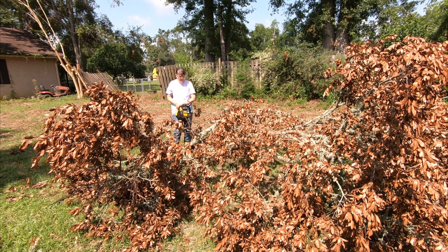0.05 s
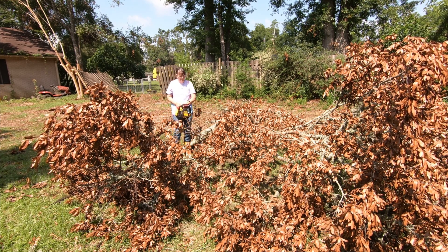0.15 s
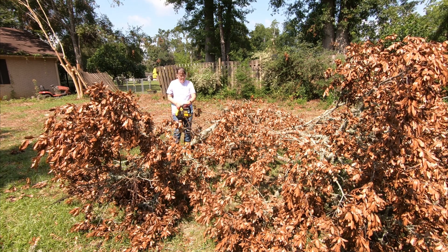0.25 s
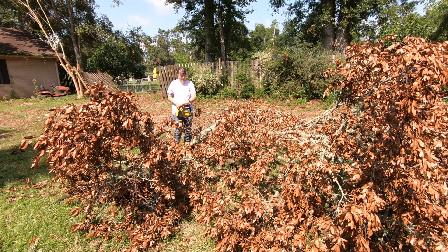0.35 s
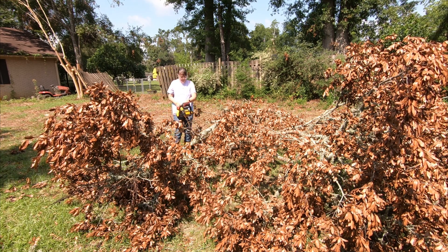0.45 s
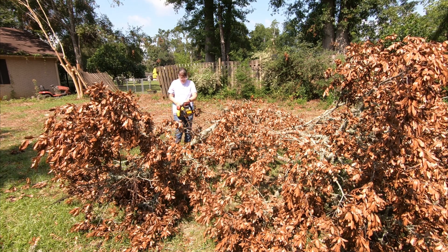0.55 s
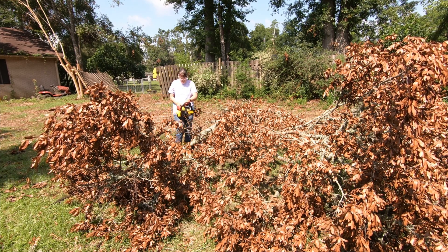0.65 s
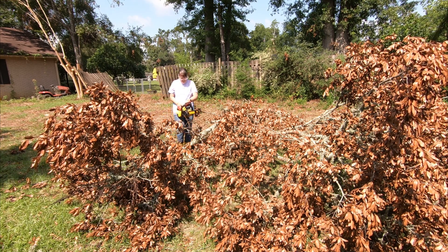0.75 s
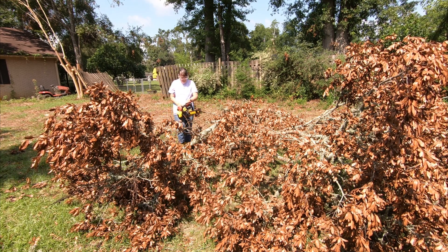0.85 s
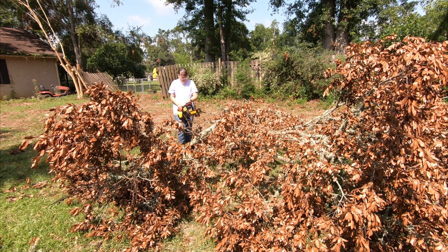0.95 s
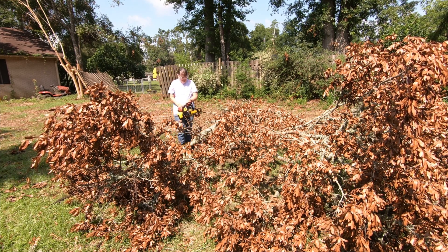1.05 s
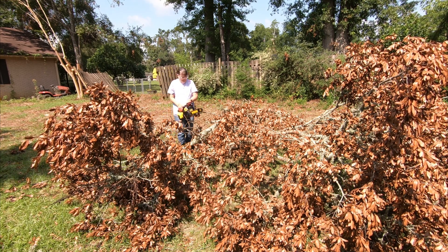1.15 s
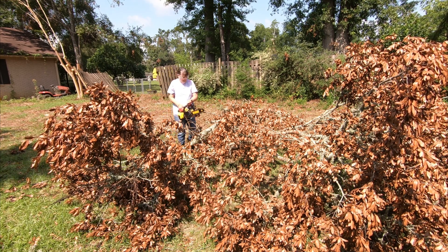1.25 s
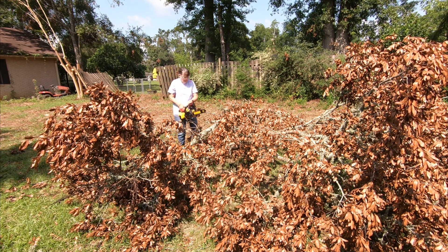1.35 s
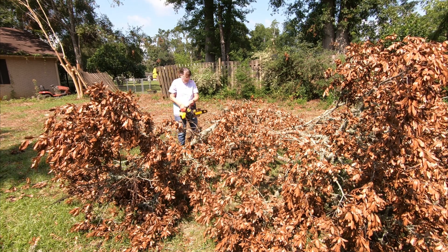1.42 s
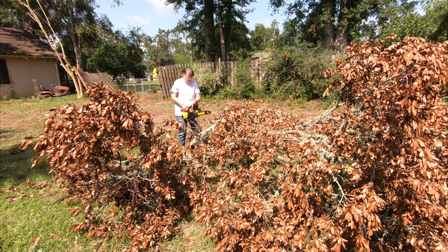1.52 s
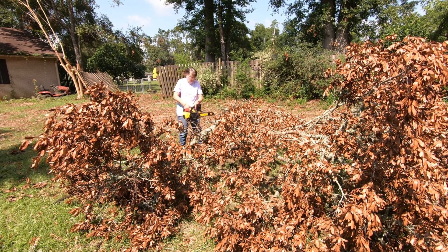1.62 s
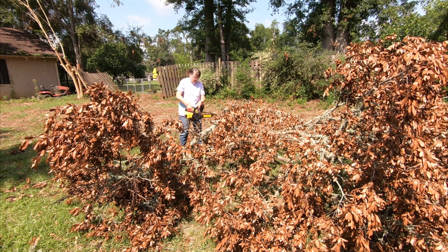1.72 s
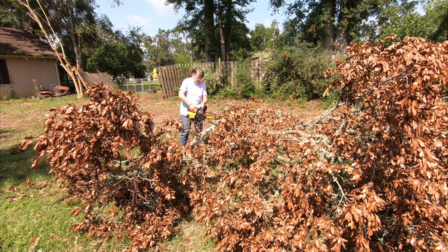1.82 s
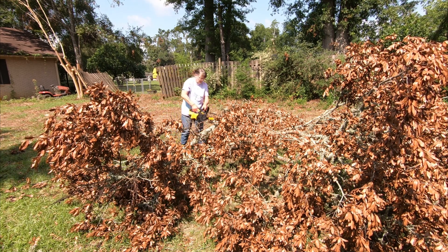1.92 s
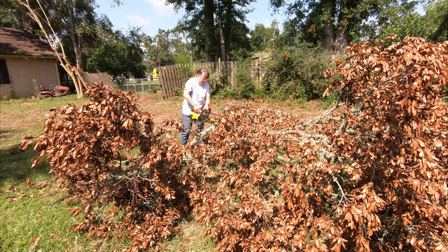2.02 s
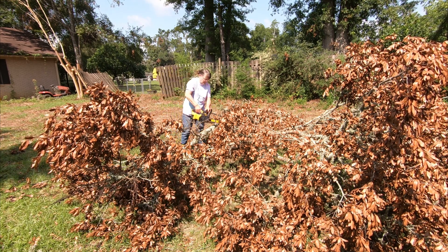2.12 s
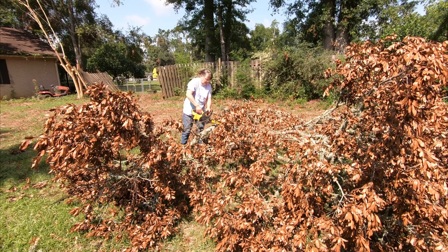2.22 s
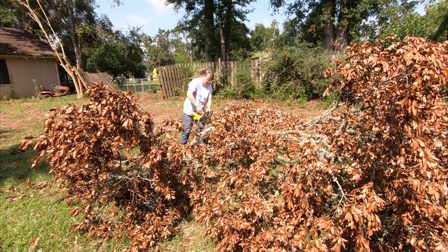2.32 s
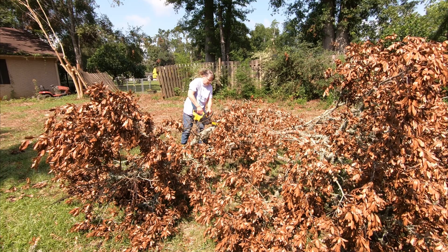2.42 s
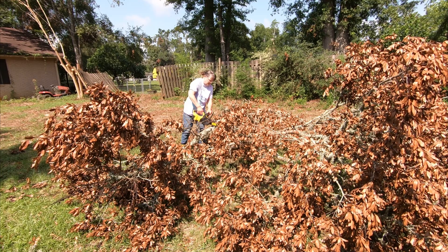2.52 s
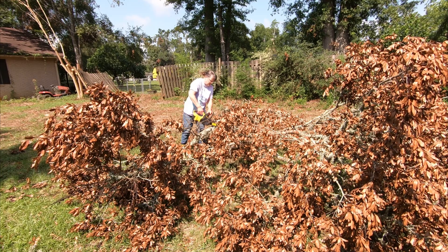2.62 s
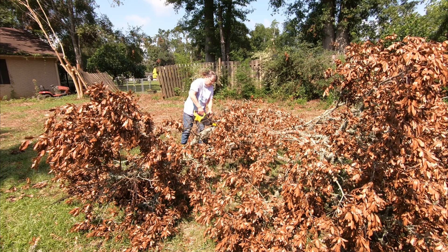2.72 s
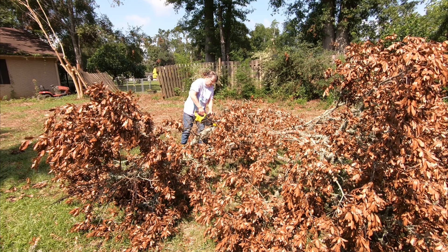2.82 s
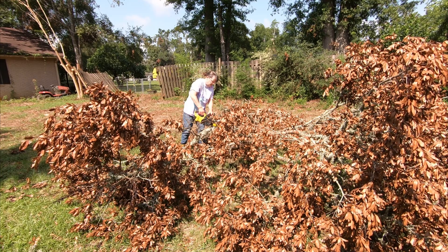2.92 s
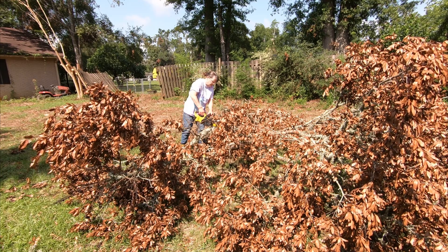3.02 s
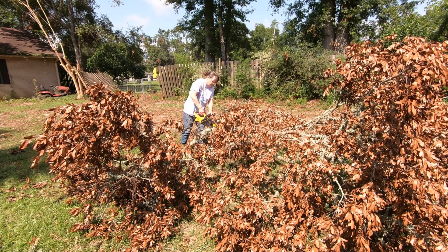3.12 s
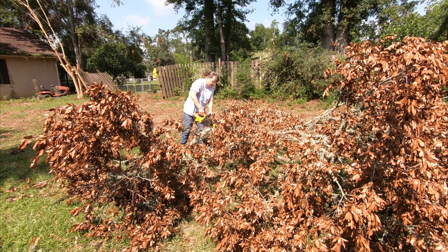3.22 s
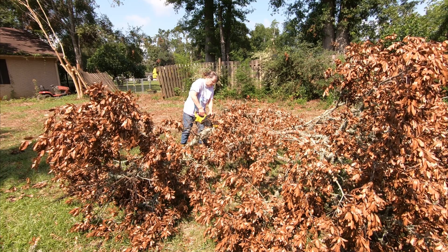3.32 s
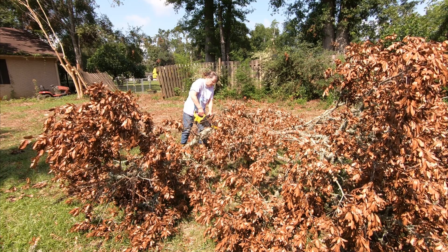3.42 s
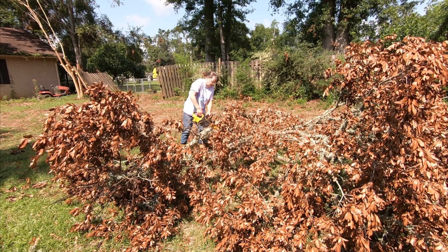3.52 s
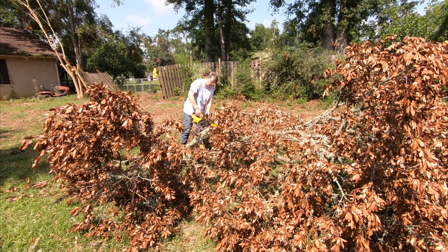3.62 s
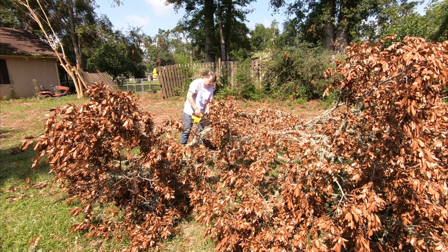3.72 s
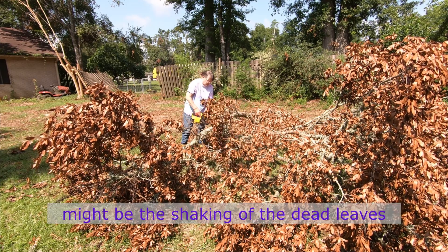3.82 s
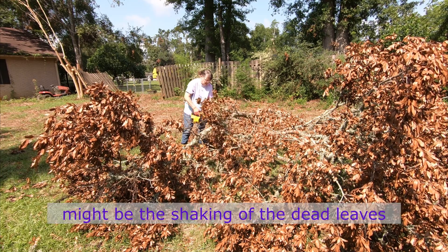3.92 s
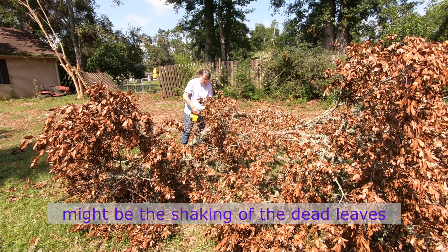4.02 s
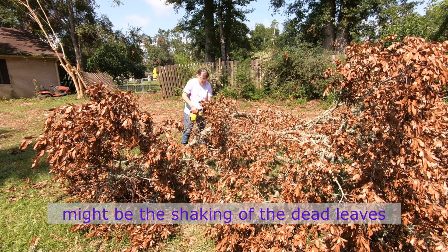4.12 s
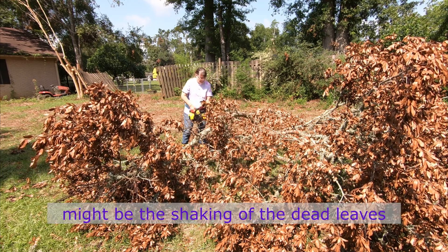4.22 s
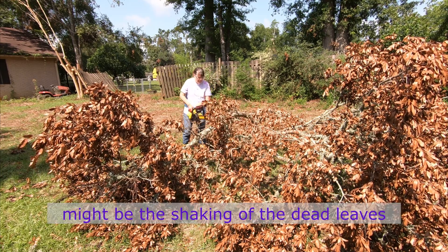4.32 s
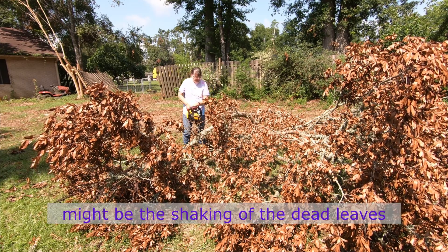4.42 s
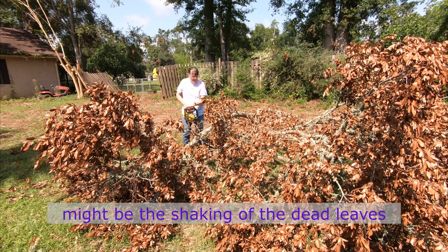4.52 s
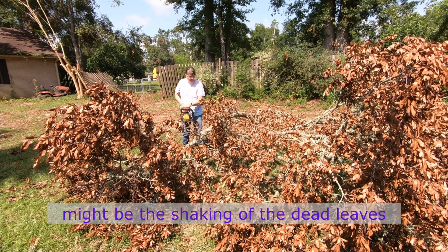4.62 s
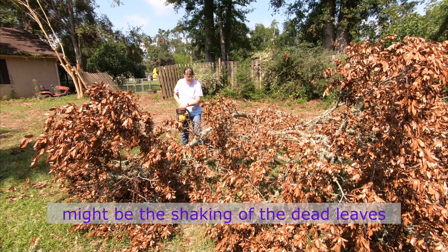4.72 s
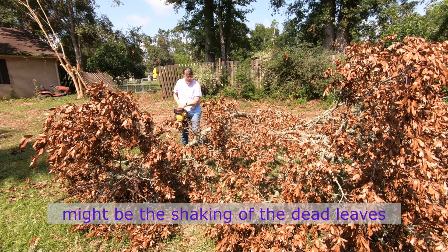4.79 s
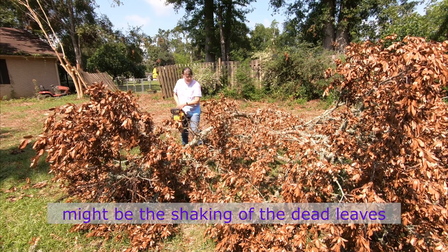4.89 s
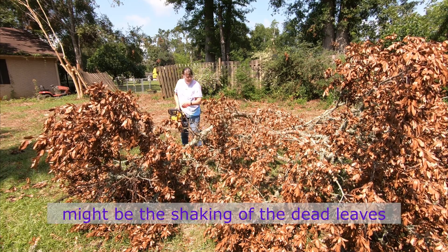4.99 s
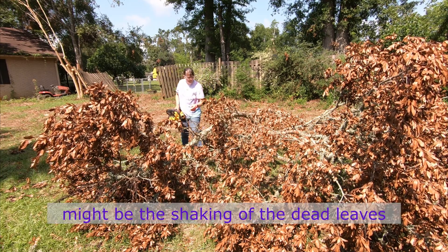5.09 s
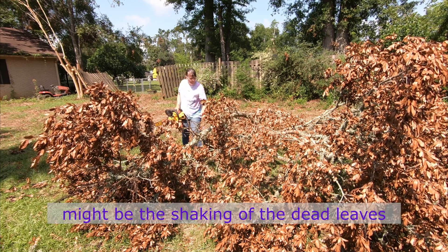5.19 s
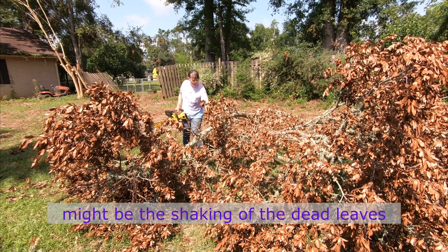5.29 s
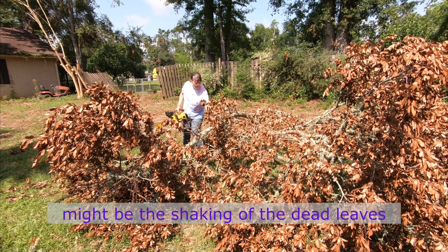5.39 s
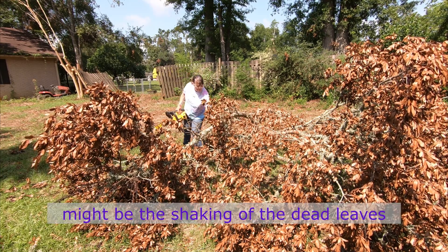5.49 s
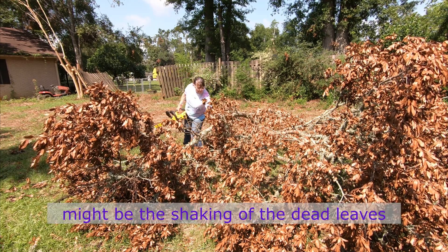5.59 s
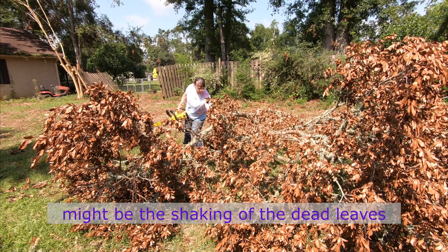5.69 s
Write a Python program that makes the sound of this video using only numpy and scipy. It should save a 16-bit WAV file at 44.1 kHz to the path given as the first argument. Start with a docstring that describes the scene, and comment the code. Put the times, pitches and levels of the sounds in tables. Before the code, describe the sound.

A small cordless chainsaw clicks on, whirs up to a rattling high whine, nips dry branches, then coasts down in a quiet garden as a bird calls.

```python
"""A katydid buzzes throughout as scraped resonances, over the coloured noise of a far road and low swells.
A cordless chainsaw, some metres off in a garden, clicks on, spins up, nips into dry branches and coasts to rest.
One chain speed drives its noisy rattle round the bar, the summed partials of its hum and the motor's whine.
As it stops a bird calls in gliding tones; then dry leaves crackle briefly while a far car passes.
A house wall and trees answer saw and bird with a smeared echo and a thin tail."""
import sys
import numpy as np
from scipy import signal
from scipy.fft import rfft, irfft, next_fast_len
from scipy.io import wavfile
from scipy.ndimage import uniform_filter1d, map_coordinates

SR = 44100
rng = np.random.default_rng(int(sys.argv[2]) if len(sys.argv) > 2 else 0)


def persist_wave(psi):
    """Save psi, clipped to +-1, as 16-bit WAV."""
    counts = np.round(np.clip(psi, -1, 1) * 32767).astype(np.int16)
    wavfile.write(sys.argv[1], SR, np.atleast_2d(counts).T)


N = 253575

# how alike left and right are in the open air: (frequency [Hz], correlation [-1 to 1])
AIR_ALIKE = [(150, .99), (900, 0.68), (2400, 0.8), (6000, 0.42)]
TOP_HZ = 15000  # upper limit of the whole sound
# the trigger is pulled and let go; the chain then takes this long to coast to rest
PULL_S, RELEASE_S, COAST_S = 1.449, 3.68, 0.42
FULL_HZ = 385.6  # cutters passing a second at full speed, free of drag


def amp(db):
    """Decibels to gain."""
    return 10 ** (np.asarray(db) / 20)


def unit(x):
    """Scaled to rms 1."""
    return x / np.sqrt(np.mean(x ** 2) + 1e-20)


def seconds():
    """The time of every sample."""
    return np.arange(N) / SR


def along(points, hz):
    """Reads (frequency [Hz], value) points on a log frequency axis."""
    f, v = np.transpose(points)
    return np.interp(np.log(hz + 1), np.log(f + 1), v)


def wobble(rate):
    """A smooth random curve, rate knots a second."""
    knots = rng.standard_normal(int(N * rate / SR) + 4)
    return map_coordinates(knots, [np.arange(N) * rate / SR])


def bumps(rows):
    """The sum of smooth bumps: (time [s], half length to 1/e [s], height)."""
    return sum(height * np.exp(-((seconds() - s) / length) ** 2) for s, length, height in rows)


def filtered(x, response):
    """Shapes x by a response of frequency, with room for the filter to ring."""
    m = next_fast_len(N + SR // 2)
    return irfft(rfft(x, m) * response(np.fft.rfftfreq(m, 1 / SR)), m)[..., :N]


def colour(spectrum):
    """The gain function of (frequency [Hz], level [dB]) points."""
    return lambda hz: amp(along(spectrum, hz))


def rush(gain, alike):
    """Stereo noise of rms 1, its colour and left-right likeness set by the mix of mid and side."""
    def mid_side(hz):
        turn = np.arccos(np.clip(along(alike, hz), -1, 1)) / 2
        return gain(hz) * [np.cos(turn), np.sin(turn)]

    mid, side = filtered(rng.standard_normal((2, N)), mid_side)
    return unit(np.array([mid + side, mid - side]))


def placed(x, balance):
    """Each frequency leans to its own side."""
    return filtered(x, lambda hz: amp(np.outer([.5, -.5], along(balance, hz))))


def add(track, start_s, sound):
    """Mixes a sound into a track at a time."""
    part = track[max(round(start_s * SR), 0):][:len(sound)]
    part += sound[:len(part)]


def ringing(modes, hz):
    """How strongly a set of resonant bands lifts a frequency: their powers add."""
    return np.sqrt(sum(amp(db) ** 2 / (1 + (2 * (hz - centre) / width) ** 2) ** 2
                       for centre, width, db in modes))


def katydid(sharp=0.72):
    """Each wing stroke scrapes a burst into a few narrow, very high resonances."""
    # bands of the buzz: (centre [Hz], width [Hz], level [dB])
    buzz_bands = [(10125, 680, -62), (9500, 1200, -68.5), (13900, 600, -79)]
    strokes = 68.7 * seconds() + .04 * wobble(5)  # about 69 a second, slightly uneven
    pulse = np.exp(-sharp * (strokes % 1))
    out = np.zeros((2, N))
    for centre, width, db in buzz_bands:
        scrape = pulse * rng.standard_normal((2, N))
        band = filtered(scrape, lambda hz: 1 / (1 + (2 * (hz - centre) / width) ** 2) ** 1.78)
        out += amp(db) * unit(band)
    return out


def traffic(rumble_db=-44, wash_db=-45):
    """Lumpy low rumble with swells, an even wash of tyres on a far road, and one car that comes and goes."""
    # colours of rumble, tyre wash and passing car: (frequency [Hz], relative level per Hz [dB])
    rumble_colour = [(20, -25), (35, -16), (50, -2.5), (66, 5), (90, 1), (182, -7.5), (260, -21.5),
                     (400, -32), (880, -86)]
    wash_colour = [(180, -4.5), (330, -14), (480, -11), (656, 0.5), (897, 2), (1730, -12.5), (2540, -17),
                   (3600, -21.5), (4740, -17), (6040, -28), (7700, -35), (9000, -28.5), (11700, -77)]
    car_colour = [(80, -9), (140, 4), (220, 1), (340, -17.5), (700, -7), (1100, -2.5), (1800, -18.5),
                  (4000, -59)]
    # low swells: a short thump of wind or handling, then slower rises of the road:
    # (time [s], half length to 1/e [s], rise [dB])
    low_swells = [(1.9, 0.16, 7), (2.7, 0.39, 3.8), (5.3, 0.96, 2)]
    # left over right: (frequency [Hz], balance [dB])
    air_side = [(180, 0.5), (550, 3.5), (1640, 5.5), (4950, -5), (10000, -4)]
    pass_s, pass_length_s, pass_db = 5.25, 0.78, -44.5  # the car's peak, half length to 1/e and peak level
    rumble_level = amp(rumble_db + bumps(low_swells) + 1.13 * wobble(24))
    rumble = rumble_level * rush(colour(rumble_colour), AIR_ALIKE)
    wash = amp(wash_db + .7 * wobble(6)) * rush(colour(wash_colour), AIR_ALIKE)
    passing = bumps([(pass_s, pass_length_s, 1)])
    car = amp(pass_db) * passing * rush(colour(car_colour), AIR_ALIKE)
    return placed(rumble + wash + car, air_side)


def clicks(t60=0.012, click_db=-8, dull_hz=8000):
    """Short dry snaps, each a crack and a narrow ring, dulled by distance."""
    # clicks of the trigger, chain and twigs: (time [s], relative level [dB], ring [Hz])
    snaps = [(1.407, -27.5, 3630), (1.446, -31, 3680), (2.907, -14, 3920), (3.309, -11, 3370),
             (3.364, -15, 3900), (3.373, -14, 4670), (3.593, -22, 4690), (4.081, -27.5, 2330)]
    out, t = np.zeros(N), np.arange(SR // 10) / SR
    for s, db, hz in snaps:
        noise = rng.standard_normal(len(t))
        ring = unit(signal.lfilter(*signal.iirpeak(hz, 6, SR), noise))
        crack = signal.lfilter(*signal.butter(2, min(2.5 * hz, TOP_HZ), fs=SR), noise)
        snap = ring * amp(-60 * t / t60) + 1.3 * crack * amp(-60 * t / 0.014)
        add(out, s, amp(db + click_db) * snap)
    return filtered(out, lambda hz: 1 / (1 + (hz / dull_hz) ** 4))


def drive(spin_up_s=0.893, rise_power=1.052, fall_power=1.175, crawl_hz=10):
    """Chain speed and bite: it spins up, sags at each nip while the governor catches up, then coasts."""
    # the chain nips a branch: (time [s], half length to 1/e [s], drag on the speed [Hz])
    nips = [(2.778, .061, 2.1), (2.909, .031, 12.6), (3.073, .064, 11.1), (3.167, .069, 10.9),
            (3.367, .079, 22), (3.609, .04, 8.8)]
    governor_gain, governor_lag_s = 1.44, 0.62  # speed given back per drag (ratio), after a lag
    deep_hz, shake_s = 6.4, 0.13  # drag of a deep bite, and how long the twigs shake
    t, drag = seconds(), bumps(nips)
    keep = np.exp(-1 / (governor_lag_s * SR))
    lagged_drag = signal.lfilter([1 - keep], [1, -keep], drag)
    governed = FULL_HZ - drag + governor_gain * lagged_drag
    rising = np.clip((t - PULL_S) / spin_up_s, 0, 1) ** rise_power
    falling = np.clip(1 - (t - RELEASE_S) / COAST_S, 0, 1) ** fall_power
    speed = np.maximum(governed * rising * falling, crawl_hz)
    bite = np.tanh(np.abs(uniform_filter1d(drag, int(shake_s * SR))) / deep_hz)
    return speed, bite


def loudness(law, speed, bite, slacken_s=0.24):
    """A layer's dB: it grows with speed and changes when the chain bites or the motor lets go."""
    full_db, power, bite_db, coast_db = law
    coasting = np.clip((seconds() - RELEASE_S) / slacken_s, 0, 1)
    return full_db + power * 20 * np.log10(speed / FULL_HZ) + bite_db * bite + coast_db * coasting


def bar(hz):
    """How strongly bar and housing ring at a frequency."""
    # resonances of bar and housing: (centre [Hz], width [Hz], level [dB])
    bar_modes = [(592, 223, 2), (1390, 110, 1.5), (1735, 260, 2), (2215, 530, -0.5), (3270, 570, -8.5),
                 (5090, 560, -10)]
    return ringing(bar_modes, hz)


def chain(cutters, speed, bite, chatter_db=1.7, clink_db=2.0):
    """Links clatter on the bar, in surges once a sprocket turn while the chain runs free."""
    # colours of the clatter and its treble: (frequency [Hz], relative level per Hz [dB])
    rattle_colour = [(120, -65), (200, -25.5), (330, -48), (430, -10.5), (560, -2), (720, -6), (860, -3.5),
                     (1010, -8.5), (1270, 0), (2070, -12), (2370, -5.5), (2820, -7.5), (4680, -8),
                     (5300, -9), (6500, -22.5), (9100, -51)]
    hiss_colour = [(3400, -38), (5800, -14), (6530, -5.5), (7250, -0.5), (7810, -3), (9760, 4),
                   (11000, -7.5), (14000, -16), (15000, -35)]
    # left-right likeness: (frequency [Hz], correlation [values over 1 count as 1])
    saw_alike = [(500, 1), (1600, 17.5), (4500, 1.35), (9000, 0.1), (14000, 2)]
    # (level at full speed [dB], power of speed, added by a deep bite [dB], added while coasting [dB])
    rattle_law = (-28, 0.91, -0.5, -2.8)
    hiss_law = (-39.5, 1.3, 1.5, -0.3)
    # the slack chain slaps the bar hardest at a middling speed, and falls off away from it
    slap_db, slap_hz, slap_fall_db = -33.5, 228, 8
    ring_db = slap_db - slap_fall_db * (speed / slap_hz - 1) ** 2
    surge = 1 + .24 * (1 - bite) * np.cos(2 * np.pi * cutters / 3)
    # a slow chain clinks unevenly, and twigs make a fast one chatter
    slow = 1 - speed / speed.max()
    jolt_db = (chatter_db * bite + clink_db * slow) * (wobble(330) + wobble(55)) / 2
    rattle = amp(loudness(rattle_law, speed, bite) + jolt_db) * rush(colour(rattle_colour), saw_alike)
    hiss = amp(loudness(hiss_law, speed, bite) + jolt_db) * rush(colour(hiss_colour), saw_alike)
    # loose links tap the bar at random, the more often the faster they run
    tap_rate = 800 + 5 * speed
    taps = (rng.random(N) < tap_rate / SR) * rng.uniform(-0.64, 1, N) / np.sqrt(tap_rate)
    slap = amp(ring_db) * unit(filtered(taps, bar))
    return surge * (rattle + hiss) + slap


def hum(cutters, speed, bite, flutter=0.0084, rough=0.1, ring=3.55, cut_hz=365):
    """Chain, sprocket and motor rotation hum together; each partial swells as it crosses a resonance."""
    # partials of chain, sprocket and motor rotation: (multiple of the sprocket's rate, relative level [dB])
    turning_partials = [(3, -7.5), (6, -3), (9, -2.4), (10, -17), (12, -15), (15, -15.5), (18, -17.5),
                        (20, -16.5), (27, -12), (30, -15)]
    # (level at full speed [dB], power of speed, added by a deep bite [dB], added while coasting [dB])
    hum_law = (-34.0, 1.98, -0.6, -4)
    hum_db = loudness(hum_law, speed, bite)
    turns, turn_hz = cutters / 3, speed / 3  # three cutters pass in each sprocket turn
    phase = turns + flutter * (0.35 + bite) * wobble(60)
    out = np.zeros(N)
    for multiple, db in turning_partials:
        k = round(multiple)
        hz = k * turn_hz
        bass_cut = np.sqrt(1 + (cut_hz / hz) ** 10)  # the small saw sends out no bass
        radiated = (1 + ring * bar(hz) ** 2) / bass_cut
        swell = amp(db + 1.66 * wobble(12)) * (1 + rough * (.5 + bite) * wobble(110))
        out += swell * radiated * np.sin(2 * np.pi * k * phase)
    return np.sqrt(2) * amp(hum_db) * out


def motor(cutters, speed, bite, order=12, peak_gain=3.0, whine_from_hz=49):
    """The motor's poles whine roughly above a low chain speed, louder in a few bands of pitch."""
    # bands where the whine and its reflection off the ground reinforce: (centre [Hz], width [Hz], level [dB])
    whine_peaks = [(1730, 200, 10), (2020, 280, 5.5), (3050, 280, -1.5), (4050, 620, -12)]
    # (level at full speed [dB], power of speed, added by a deep bite [dB], added while coasting [dB])
    whine_law = (-41.5, 0.5, 4, -32)
    sings = 1 / np.sqrt(1 + (whine_from_hz / speed) ** 10)
    reinforced = 1 + peak_gain * ringing(whine_peaks, order * speed)
    level = amp(loudness(whine_law, speed, bite) + 2.3 * wobble(90)) * sings * reinforced
    return level * np.sin(2 * np.pi * order * cutters + 0.66 * wobble(180))


def twigs(bite, twigs_db=-38, snap_hz=3600, knock_hz=900, knock=0.85, life=0.0032):
    """Cutters flick dry twigs at random: each flick is a bright snap and a woody knock."""
    hits = (rng.random(N) < 260 * bite / SR) * amp(2 * rng.standard_normal(N))  # up to 260 a second
    fading = signal.lfilter([1], [1, -np.exp(-1 / (life * SR))], hits)  # life in seconds
    bursts = fading * rng.standard_normal(N)
    snap = unit(signal.lfilter(*signal.iirpeak(snap_hz, 0.68, SR), bursts))
    woody = unit(signal.lfilter(*signal.iirpeak(knock_hz, 1, SR), bursts))
    wood = filtered(snap + knock * woody, lambda hz: 1 / (1 + (hz / 5500) ** 10))
    return amp(twigs_db) * unit(wood)


def saw(catch_s=0.0083, settle_s=0.14):
    """One chain speed drives the rattle, the hum and the whine; its bite drives the twigs."""
    # left over right: (frequency [Hz], balance [dB])
    saw_side = [(250, 2.5), (600, 2.5), (1220, 5.5), (2010, 2), (3310, -.5), (5470, -3.5), (9040, 4.5),
                (13000, -1)]
    # (frequency [Hz], phase by which the left side leads [radians])
    saw_lead = [(400, -0.18), (2400, -0.91), (5000, 1), (9300, 1)]
    speed, bite = drive()
    cutters = np.cumsum(speed) / SR
    rest_s = RELEASE_S + COAST_S
    fade_times = [PULL_S, PULL_S + catch_s, rest_s - settle_s, rest_s + settle_s / 2]
    moving = np.interp(seconds(), fade_times, [0, 1, 1, 0])
    body = chain(cutters, speed, bite) + hum(cutters, speed, bite)
    body = body + motor(cutters, speed, bite) + twigs(bite)
    pair = placed(moving * body + clicks(), saw_side)
    return filtered(pair, lambda hz: np.exp(1j * np.outer([.5, -.5], along(saw_lead, hz))))


def bird(side_db=-1.0):
    """Slurs, some answered by a level whistle: sines that follow a pitch curve."""
    # the slur is a quick falling flick, a jump back up, then a falling slur; the whistle stays nearly level:
    # (time into the note [s], pitch before the call's ratio [Hz], relative level [dB])
    slur = [(0, 3200, -37), (.008, 3052, -8), (.02, 2342, -12), (.026, 3070, -13), (.036, 2650, -4),
            (.052, 2480, -7), (.085, 2360, -17.5), (.125, 2030, -17)]
    whistle = [(0, 2064, -13), (.025, 2420, -3), (.045, 2438, 4), (.07, 2420, -7), (0.094, 2425, 0)]
    # (time [s], note [0 slur, 1 whistle], level added to the note's [dB], pitch ratio)
    calls = [(4.054, 0, -40.5, 0.99), (4.205, 1, -48.5, 0.95), (4.405, 0, -36, 1), (4.558, 1, -46.5, 1),
             (5.079, 0, -38.5, 1.02), (5.215, 0, -42, .94), (5.57, 0, -35, 1)]
    out = np.zeros(N)
    for s, note, db, ratio in calls:
        times, hz, shape_db = np.transpose([slur, whistle][round(note)])
        t = np.arange(int(times[-1] * SR)) / SR
        phase = np.cumsum(ratio * np.interp(t, times, hz)) / SR
        add(out, s, amp(db + np.interp(t, times, shape_db)) * np.sin(2 * np.pi * phase))
    return out * amp(wobble(170) + [[side_db], [-side_db]])


def leaves(loudest_s=5.165, rustle_db=-53, rise_db_per_s=130, fall_db_per_s=260):
    """Dry leaves brushed aside: a brief rustle of coloured noise with a crackling level."""
    t = seconds() - loudest_s
    level_db = rustle_db + np.minimum(rise_db_per_s * t, -fall_db_per_s * t)
    crackle = amp(2.5 * wobble(300))
    dry_colour = colour([(1500, -34), (3000, 7), (5000, 8), (8000, -20), (15000, -51)])
    return amp(level_db) * crackle * rush(dry_colour, AIR_ALIKE)


def garden(x, wall_db, trees_db, delay=.074):
    """The house wall sends back one smeared echo and the trees a thin tail."""
    # decay of the tail: (frequency [Hz], time to fall 60 dB [s])
    tail_t60 = [(300, 0.25), (2500, 0.31), (10000, 0.093)]
    hz, t, z = signal.stft(rng.standard_normal((2, SR // 2)), SR, nperseg=256)
    decay = amp(-60 * t / along(tail_t60, hz)[:, None])
    tail = signal.istft(z * decay, SR, nperseg=256)[1]
    answer = amp(trees_db) * tail / np.linalg.norm(tail[0])
    smear = rng.standard_normal(SR // 20) * np.linspace(1, 0, SR // 20) ** 2
    for channel in answer:
        add(channel, delay, amp(wall_db) * smear / np.linalg.norm(smear))
    return x + signal.fftconvolve(x, answer, axes=1)[:, :N]


def scene():
    """Saw and bird echo in the garden, over insect, leaves and road."""
    echoing_saw = garden(saw(), wall_db=-14.5, trees_db=-23.5)
    echoing_bird = garden(bird(), wall_db=-11.5, trees_db=-9.5)
    return katydid() + traffic() + echoing_saw + echoing_bird + leaves()


def record(dry):
    """A sharp low-pass leaves nothing above the upper limit."""
    return filtered(dry, lambda hz: hz < TOP_HZ)


dry = scene()
out = record(dry)
persist_wave(out)
```